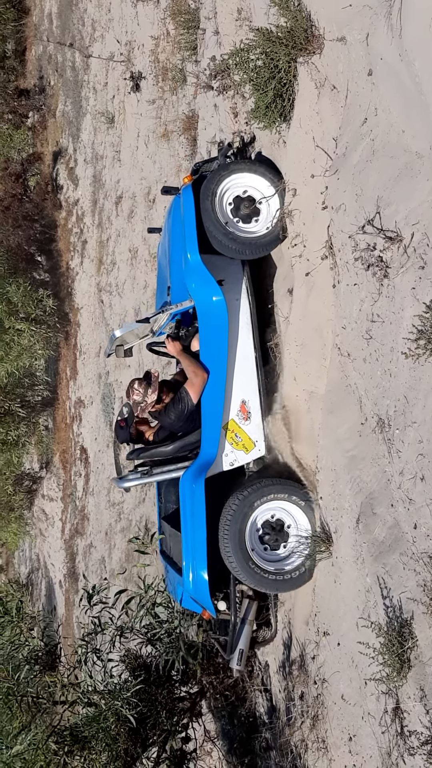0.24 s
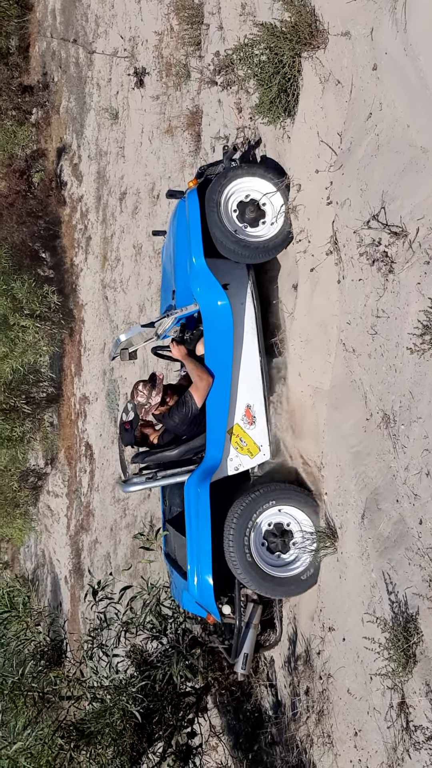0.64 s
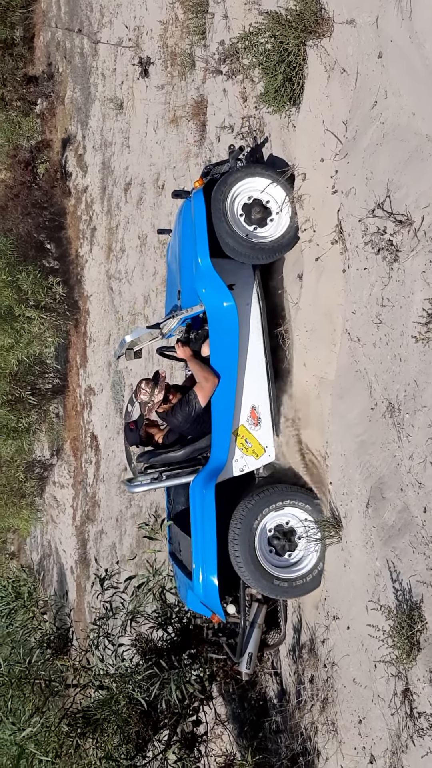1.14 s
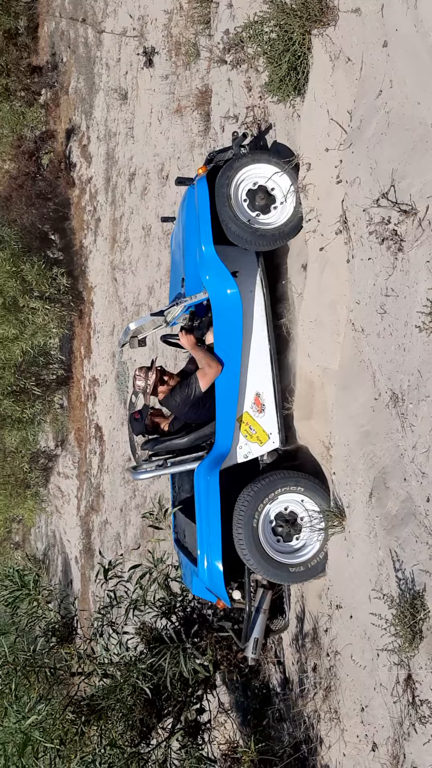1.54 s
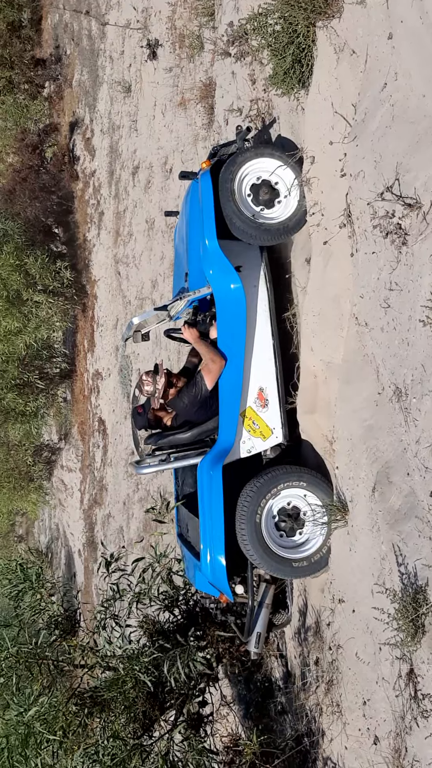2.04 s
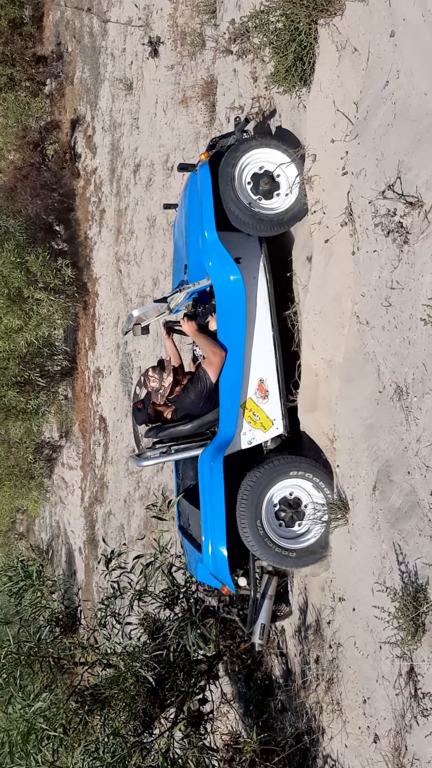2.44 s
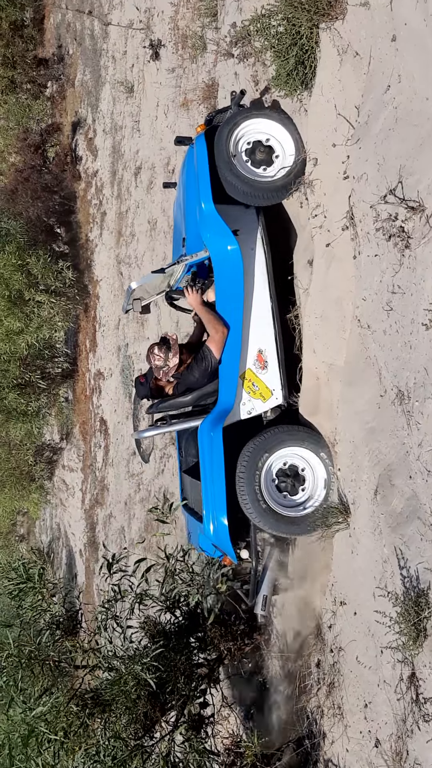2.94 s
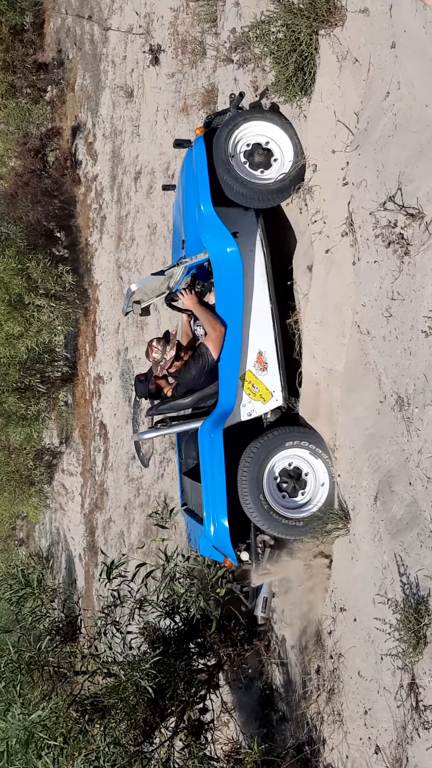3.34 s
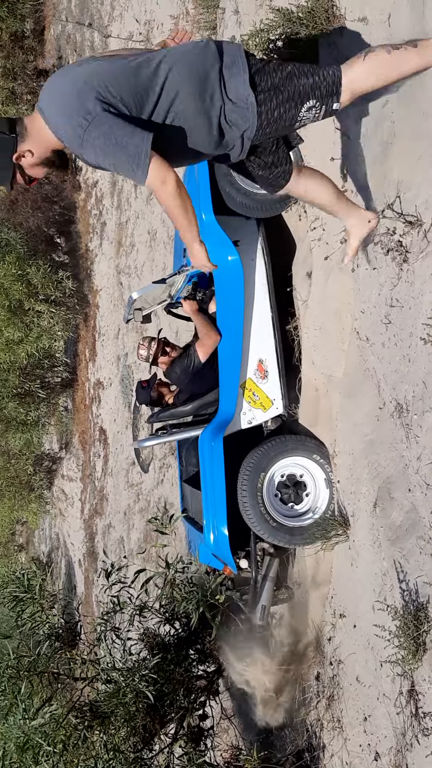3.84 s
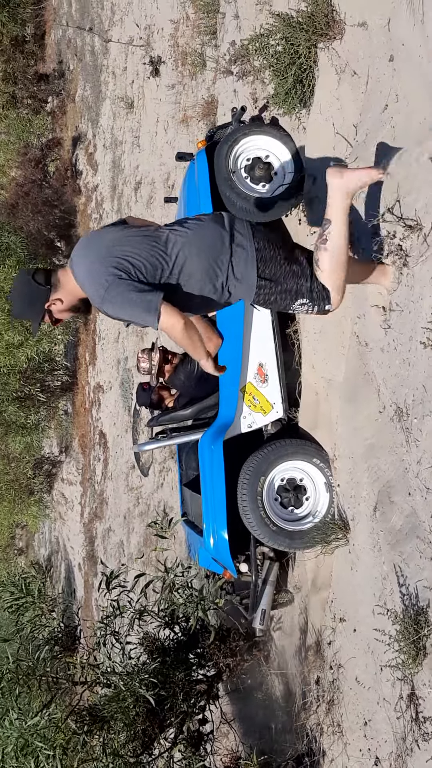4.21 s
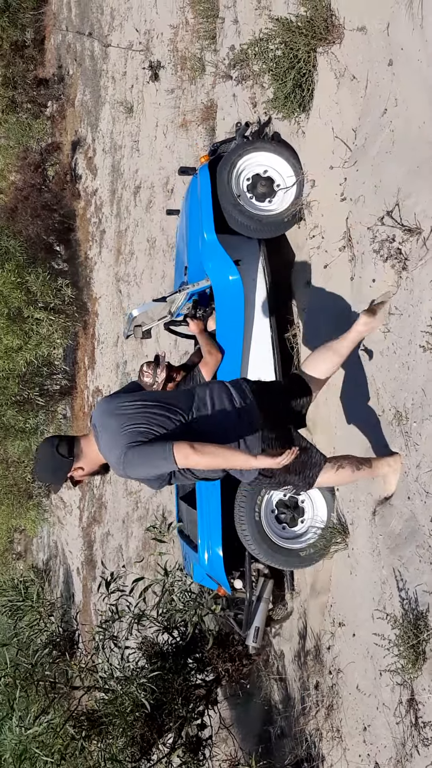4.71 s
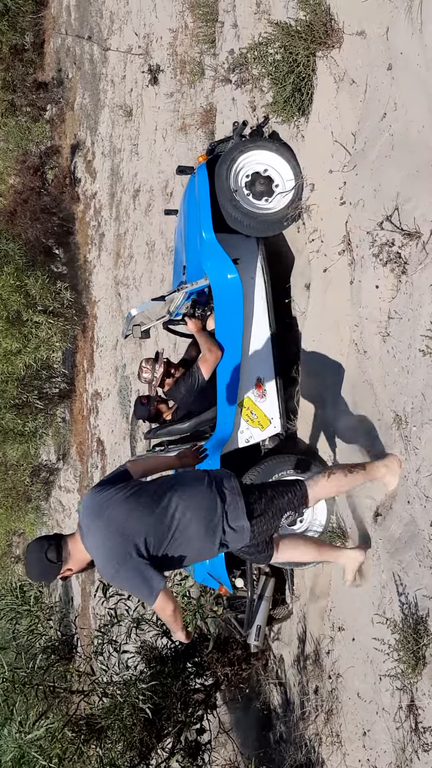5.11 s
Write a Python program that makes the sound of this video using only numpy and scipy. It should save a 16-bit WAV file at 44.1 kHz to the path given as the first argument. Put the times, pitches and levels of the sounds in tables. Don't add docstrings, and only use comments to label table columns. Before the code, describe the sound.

Close, dry exhaust thumps and barks rise and fall in two revs, with drive-line knocks, pops and a late rush of gritty sand.

```python
import sys
import numpy as np
from scipy import signal
from scipy.fft import rfft, irfft, next_fast_len
from scipy.io import wavfile
from scipy.ndimage import uniform_filter1d

SR = 44100
rng = np.random.default_rng(int(sys.argv[2]) if len(sys.argv) > 2 else 0)


def file_out(sig):
    cols = np.atleast_2d(sig).T
    lim = np.clip(cols, -1, 1)
    pcm = np.round(lim * 32767).astype(np.int16)
    wavfile.write(sys.argv[1], SR, pcm)


def makeup_ratio(level_db):
    decades = np.asarray(level_db, float) / 20
    return 10 ** decades


N = 236596
LONG = next_fast_len(N + 8192, real=True)

# f/Hz, level/dB
COOL_PIPE = [(30, -19.5), (56, -7.5), (66, 2.5), (80, 12), (112, 4.5), (140, 5), (170, 7.5), (200, 3),
             (235, -1.5), (270, -8), (330, -21.5), (420, -34.5), (560, -34.5), (1000, -67)]


def read(points, hz):
    f, value = np.transpose(points)
    return np.interp(np.log(hz + 1), np.log(f + 1), value)


def by_speed(table, rate):
    speed, *columns = np.transpose(table)
    return [np.interp(rate, speed, column) for column in columns]


def steady(x, span=0.059):
    size = round(span * SR)
    power = np.atleast_2d(x ** 2).mean(0)
    power = uniform_filter1d(uniform_filter1d(power, size), size)
    return x / np.sqrt(abs(power) + 1e-20)


def colour_db(points, hz, below_db=30):
    octaves = np.log2((hz + 1) / (np.clip(hz, points[0][0], points[-1][0]) + 1))
    fall_db = np.where(octaves > 0, 30, below_db) * abs(octaves)
    return np.maximum(read(points, hz) - fall_db, -100)


def causal(points):
    hz = abs(np.fft.fftfreq(16384, 1 / SR))
    log_gain = np.log(makeup_ratio(colour_db(points, hz, below_db=0)))
    return np.fft.ifft(np.exp(np.conj(signal.hilbert(log_gain)))).real[:6000]


def noise(points, envelope=1.):
    white = rng.standard_normal((2, N)) * envelope
    colour = makeup_ratio(colour_db(points, np.fft.rfftfreq(LONG, 1 / SR)))
    return irfft(rfft(white, LONG) * colour, LONG)[:, :N]


def controls():
    # t/s, rate/(firings per s)
    speed_course = [(0, 46.7), (.35, 49.8), (1.21, 51), (1.33, 57), (1.46, 52), (1.72, 58), (1.93, 78.8),
                    (2.12, 78), (2.29, 90.7), (2.55, 68.2), (3.42, 59), (3.6, 52.3), (3.95, 64.5),
                    (4.3, 73), (4.46, 82), (4.68, 66.5), (4.94, 99.2), (5.04, 93)]
    # t/s, throttle opening/(0 shut, 1 wide)
    foot = [(0, 0.57), (1.33, 0.62), (1.38, 0.06), (1.7, 0.17), (1.89, 0.4), (2.11, .24), (2.19, 0.94),
            (2.42, 0.87), (2.55, 0.71), (3.44, 0.57), (3.51, 0.0094), (4.345, 0.24), (4.37, 0.93),
            (4.67, 0.79), (4.75, 1.12), (4.95, 1.05), (5.0, 0.43), (5.36, 0.16)]
    # start t/s, length/s, loss level/dB
    falters = [
        (1.361, .112, -8.5),
        (1.976, 0.13, -4.5),
        (3.511, 0.095, -10),
        (3.621, .02, -2.5),
        (4.16, 0.15, -3),
        (4.985, 0.016, -9.5),
        (5.09, .02, -4),
        (5.155, .02, -3),
    ]
    # t/s, flare level/dB
    pops = [
        (1.252, 4),
        (1.34, 5),
        (2.18, 6.5),
        (2.42, 4),
        (4.03, 8),
        (4.366, 2.5),
        (4.381, 5),
        (4.45, 3),
        (4.689, 1),
    ]
    fade, catch, pop = 0.094, 0.0069, 0.0055
    t = np.arange(N) / SR
    rate = uniform_filter1d(np.interp(t, *np.transpose(speed_course)), round(0.054 * SR))
    throttle = np.interp(t, *np.transpose(foot))
    loss_db, pop_db = np.zeros(N), np.zeros(N)
    for start, length, db in falters:
        edges = np.minimum((t - start) / fade, (start + length - t) / catch)
        loss_db += db * np.clip(edges + .5, 0, 1)
    for s, db in pops:
        pop_db += db * np.exp(-((t - s) / pop) ** 2)
    return rate, throttle, loss_db, pop_db


def level_db(law, throttle, rate, loss_db):
    shut, gain, slope, share = law
    return shut + gain * throttle + slope * np.log2(rate / 65) + share * loss_db


def firings(rate, start, jitter, spread_db):
    cylinders_db = [.8, -.6, .4, -.6]
    turns = start + np.cumsum(rate) / SR
    at = np.flatnonzero(np.diff(np.floor(turns)))
    luck = rng.standard_normal((len(at), 2))
    shift = np.round(jitter * luck[:, 0] * SR / rate[at]).astype(int)
    at = np.clip(at + shift, 0, N - 1)
    return at, np.resize(cylinders_db, len(at)) + spread_db[at] * luck[:, 1]


def rumble(thump_db):
    # f/Hz, level/(dB per Hz)
    rumble_colour = [(25, -32), (60, -4), (110, 1.5), (220, -8), (400, -21), (700, -39)]
    return makeup_ratio(-28.5 - 5.0 + 0.8 * (thump_db + 20)) * steady(noise(rumble_colour))


def spray(throttle):
    # f/Hz, level/(dB per Hz)
    sand_colour = [(700, -10), (1500, -2), (3000, -1), (5500, -4), (8000, -13), (12000, -17)]
    clumps = np.repeat(rng.exponential(1, N // 64 + 1), 64)[:N]
    grit = makeup_ratio(3.0 * clumps.clip(0, 4))
    spin = np.clip((throttle - .9) / .25, 0, 1)
    return makeup_ratio(-37) * spin * steady(noise(sand_colour, grit))


def whistle():
    # start t/s, length/s, f/Hz, level/dB
    whistles = [
        (1.4, .31, 9255, -63),
        (3.49, .39, 9250, -61),
        (5.0, .3, 9228, -69),
    ]
    out = np.zeros(N)
    for start, length, hz, db in whistles:
        t = np.arange(0, length, 1 / SR)
        waver = 300 * uniform_filter1d(rng.standard_normal(N), 400)[:len(t)]
        tone = np.sqrt(2) * np.sin(2 * np.pi * np.cumsum(hz + waver) / SR)
        fading = makeup_ratio(db - 11 * t / length) * signal.windows.tukey(len(t), .15)
        out[round(start * SR):][:len(t)] = tone * fading
    return out


def clanks():
    # t/s, peak level/dB, centre f/Hz, time to fall 60 dB/s, width/octaves
    knocks = [(1.24, -9, 1500, 0.15, 1.5), (1.335, -12, 3600, 0.066, 0.28), (1.362, -19, 9500, 0.034, .6),
              (1.439, -17, 990, 0.074, 1.6), (1.524, -23, 3500, .05, 0.56), (1.769, -36, 2500, 0.074, 0.63),
              (2.413, -44, 1500, 0.045, 1.5), (3.572, -27, 900, .09, 2.18),
              (4.012, -15.5, 1790, 0.13, 1.08), (4.174, -19.5, 2210, 0.083, 0.96),
              (4.365, -47, 1500, 0.049, 1.2), (4.671, -3, 900, .065, 1.84), (4.734, -3, 1510, 0.12, 1.35),
              (5.089, -18, 422.6, 0.043, 0.7), (5.13, -22, 2600, 0.033, .9)]
    size = 8192
    out, t = np.zeros((2, N + size)), np.arange(size) / SR
    for s, db, hz, t60, width in knocks:
        octaves = np.log2(np.fft.rfftfreq(size, 1 / SR) / hz + 0.016)
        burst = irfft(rfft(rng.standard_normal((2, size))) / (1 + (octaves / width) ** 4))
        burst *= makeup_ratio(db - 18 - 60 * t / t60) * np.minimum(t / 0.0037, 1) / burst.std()
        out[:, round(s * SR):round(s * SR) + size] += burst
    return out[:, :N]


def puffs(colour, at, flare_db, decay, between, echo):
    flares = np.zeros(N)
    flares[at] = makeup_ratio(flare_db)
    t = np.arange(2000) / SR
    shape = (1 - np.exp(-t / .0008)) * np.exp(-t / decay)
    shape = shape / shape.max()
    shape = shape + echo * np.interp(t - .008, t, (1 - np.exp(-t / .0008)) * np.exp(-t / decay), left=0)
    return steady(noise(colour, between + signal.oaconvolve(flares, shape)[:N]))


def hiss(at, flare_db, load):
    # f/Hz, level/(dB per Hz)
    hiss_colour = [(2600, 6), (2890, 1), (3150, 5), (3450, -1), (4500, -3.5), (5500, -5.5), (6650, -10),
                   (7900, -7.5), (8600, -15.5), (10000, -10), (11300, -5.5), (13500, -9), (15700, -12.5)]
    return puffs(hiss_colour, at, flare_db, decay=0.0038, between=1.1 - 0.78 * load, echo=0.13)


def rasp(at, flare_db, load):
    # f/Hz, level/(dB per Hz)
    rasp_colour = [(650, -7.5), (900, -8), (1190, -13), (1380, -12), (1530, -3.5), (1730, -9.5), (2030, -4),
                   (2350, -9), (2600, -24.5), (3000, -25.5)]
    sputter_db = 2.0 * rng.standard_normal(len(at))
    return puffs(rasp_colour, at, flare_db + sputter_db, decay=0.0036, between=1.6 - 1.03 * load, echo=0.19)


def bark(at, flare_db, rough):
    # f/Hz, level/dB
    bark_colour = [(280, -41), (400, -11.5), (490, 3.5), (560, 4), (635, -1.5), (850, -14), (1200, -32),
                   (1530, -5.5), (1750, -24), (2040, -6), (2500, -25.5), (3500, -58)]
    fronts = np.zeros(N)
    fronts[at] = -makeup_ratio(flare_db)
    clean = steady(signal.oaconvolve(fronts, causal(bark_colour))[:N])
    blurred = puffs(bark_colour, at, flare_db, decay=0.0053, between=0.5, echo=0.23)
    return np.sqrt(1 - rough) * clean, np.sqrt(rough) * blurred


def pipe(blows, colour, swing_hz, q):
    w = 2 * np.pi * swing_hz
    all_pass = signal.bilinear([1, -w / q, w ** 2], [1, w / q, w ** 2], SR)
    return steady(signal.lfilter(*all_pass, signal.oaconvolve(blows, causal(colour))[:N]))


def thumps(at, strength_db, load, sharp):
    # f/Hz, level/dB
    hot_pipe = [(30, -18.5), (50, -20), (63, -2.5), (85, 0.5), (100, 0.5), (128, -1.5), (165, 0.5),
                (195, -2), (250, -15.5), (280, -15), (330, -26.5), (420, -43.5), (600, -27), (1000, -47.5)]
    blows = np.zeros(N)
    blows[at] = -makeup_ratio(strength_db)
    hot = pipe(blows, hot_pipe, swing_hz=50, q=3.0)
    cool = pipe(blows, COOL_PIPE, swing_hz=57, q=1.8)
    ringing = load * hot + (1 - load) * cool
    blunt = signal.sosfiltfilt(signal.butter(2, 105, fs=SR, output="sos"), ringing)
    return steady(blunt + np.clip(sharp, 0, 2) * (ringing - blunt))


def steepened(exhaust, rate):
    steep_by_speed = [(48, -2.5), (62, -2), (72, 4.5), (82, 5), (95, 3)]
    band = signal.butter(2, (206, 700), "band", fs=SR, output="sos")
    upper = signal.sosfiltfilt(band, exhaust)
    return exhaust + (makeup_ratio(by_speed(steep_by_speed, rate)[0]) - 1) * upper


def ports(direct, scattered):
    # f/Hz, likeness of the two openings/(0-1)
    likeness = [(60, 0.55), (500, 1), (1200, 0.71), (2500, 0.8), (5000, 0.32), (9000, 0.24), (15000, 0.27)]
    # f/Hz, how far the left leads/radians
    left_leads = [(0, 0), (1120, -.2), (2410, -2.7), (2760, -3.3), (4400, -4.1), (5430, -5.5), (8270, -6.9),
                  (10200, -9.3), (13800, -14.7), (15300, -19.2)]
    # f/Hz, left minus right level/dB
    lean = [(60, -1.5), (99, -1.5), (160, -2), (270, 0), (450, -4.5), (740, 0.5), (1220, 1), (2010, 8),
            (3330, 0.5), (5500, -5), (9080, -0.5), (15000, 2)]
    hz = np.fft.rfftfreq(LONG, 1 / SR)
    same = np.clip(read(likeness, hz), 0, 1)
    wave, (a, b) = rfft(direct, LONG), rfft(scattered, LONG)
    f, lead = np.transpose(left_leads)
    half = makeup_ratio(read(lean, hz) / 2) * np.exp(.5j * np.interp(hz, f, lead))
    left = (wave + same * a + np.sqrt(1 - same ** 2) * b) * half
    right = (wave + a) / half
    return irfft(np.array([left, right]), LONG)[:, :N]


def scene():
    # shut-throttle level/dB, gain wide open/dB, slope/(dB per octave of speed),
    # share of a falter's loss
    thump_law = (-16.5, 7.5, -1.3, 0.82)
    bark_law = (-47, 18.5, -5, 1.3)
    rasp_law = (-49.5, 18.5, 0.8, 0)
    hiss_law = (-52.5, 21.5, 0, 0.1)
    # rate/(firings per s), thump gain shut/dB, thump gain under load/dB,
    # sharpness of the blow shut/(0-1), sharpness under load/(0-1)
    pipe_by_speed = [(49.5, -1, 0.4, 0.64, 0.27), (58.5, 1.5, -1, 0.6, 0.77), (61.5, -1.5, -2.2, 1, 0.72),
                     (69.8, -2, -1.24, 0.71, 0.54), (75.7, 3, 0.6, 0.86, 0.5), (85, -0.9, 1.55, 0.78, 0.7),
                     (96.7, -1.5, 1.7, 0.26, 0.7)]
    # rate/(firings per s), bark gain/dB, rasp gain/dB
    rush_by_speed = [(48.9, -1, 3.5), (60, 3.5, -1.5), (74, 2, 0.5), (96, 5.5, 0.5)]

    rate, throttle, loss_db, pop_db = controls()
    load = uniform_filter1d(np.clip((throttle - .4) / 0.22, 0, 1), 1500)
    shut_db, load_db, shut_sharp, load_sharp = by_speed(pipe_by_speed, rate)
    bark_gain_db, rasp_gain_db = by_speed(rush_by_speed, rate)

    thump_db = level_db(thump_law, np.minimum(throttle, 1), rate, loss_db)
    thump_db = thump_db + shut_db + load * (load_db - shut_db)
    bark_db = level_db(bark_law, throttle, rate, loss_db) + load * bark_gain_db + pop_db
    rasp_db = level_db(rasp_law, np.minimum(throttle, 1.05), rate, loss_db)
    rasp_db = rasp_db + load * rasp_gain_db + 0.95 * pop_db
    hiss_db = level_db(hiss_law, throttle, rate, loss_db) + pop_db

    at, strength_db = firings(rate, start=.8, jitter=0.003, spread_db=0.6 - 0.35 * load)
    flare_db = 2.5 * strength_db + 1.8 * rng.standard_normal(len(at))
    sharp = shut_sharp + load * (load_sharp - shut_sharp) + 0.087 * loss_db
    burn = np.clip((thump_db + 23.5) / 4, .45, 1)
    loose_gas = steady(noise(COOL_PIPE)[0])
    exhaust = burn * steepened(thumps(at, strength_db, load, sharp), rate)
    exhaust = exhaust + np.sqrt(1 - burn ** 2) * loose_gas

    clean, blurred = bark(at, flare_db, rough=.7 - .57 * load)
    direct = makeup_ratio(thump_db) * exhaust + makeup_ratio(bark_db) * clean + whistle()
    rush = makeup_ratio(bark_db) * blurred
    rush = rush + makeup_ratio(rasp_db) * rasp(at, flare_db, load)
    rush = rush + makeup_ratio(hiss_db) * hiss(at, flare_db, load)
    return ports(direct, rumble(thump_db) + rush + clanks() + spray(throttle))


def band_limit(x):
    return signal.sosfilt(signal.butter(12, 15800, fs=SR, output="sos"), x)


def record(dry):
    squeezed = np.tanh(dry / 1.2) * 1.2
    coupled = signal.sosfilt(signal.butter(1, 12, "high", fs=SR, output="sos"), squeezed)
    return band_limit(coupled)


dry = scene()
out = record(dry)
file_out(out)
```